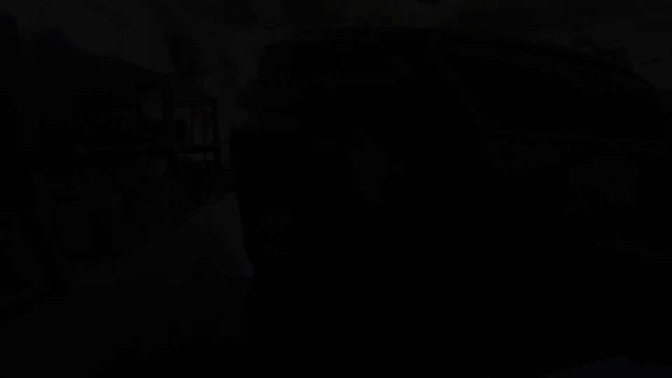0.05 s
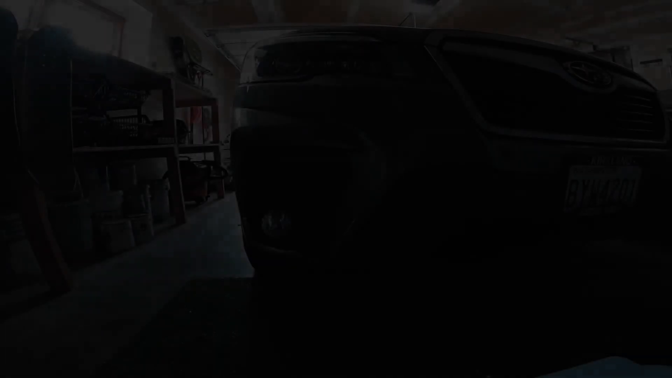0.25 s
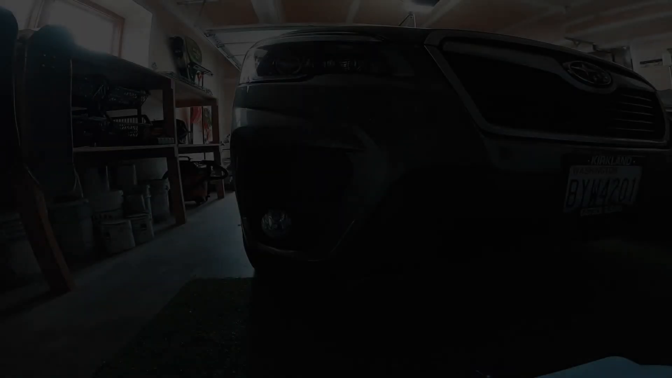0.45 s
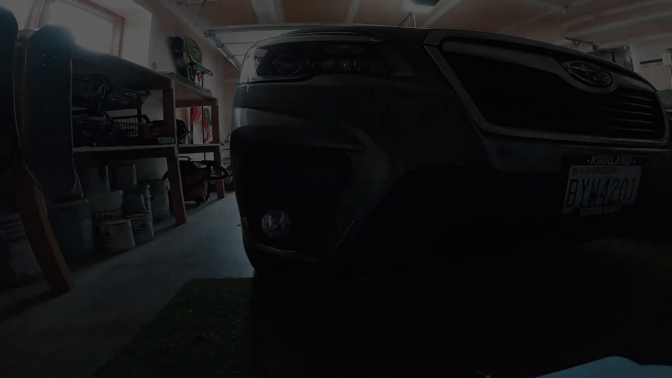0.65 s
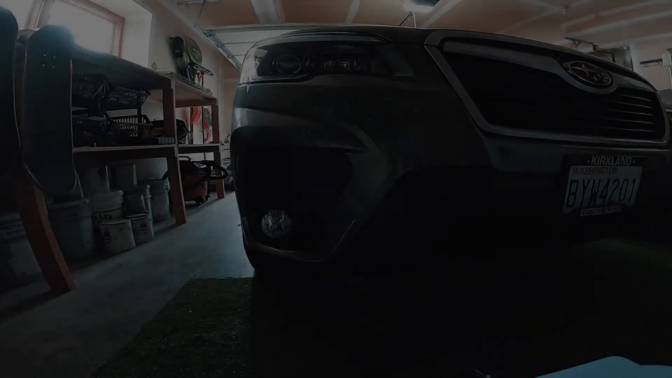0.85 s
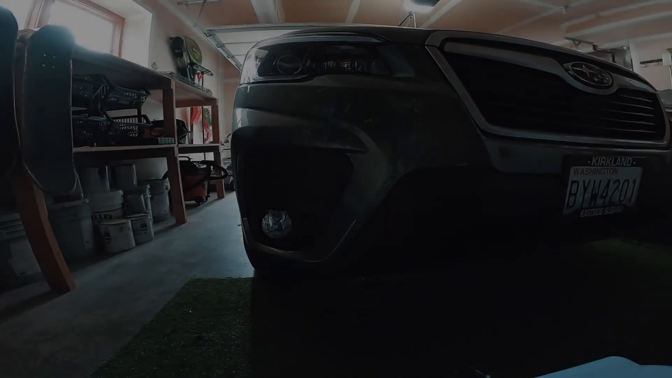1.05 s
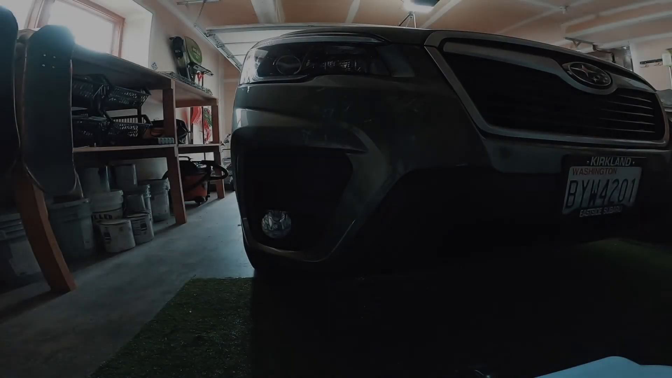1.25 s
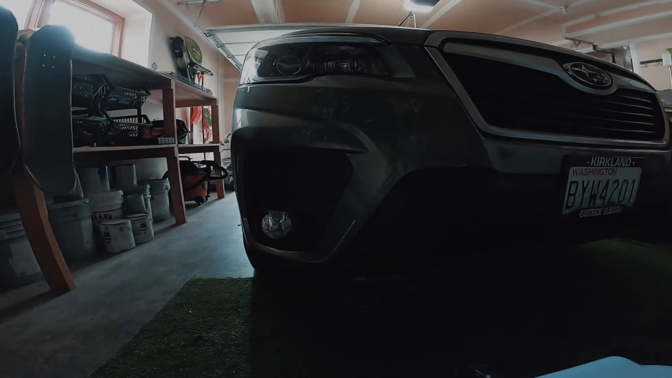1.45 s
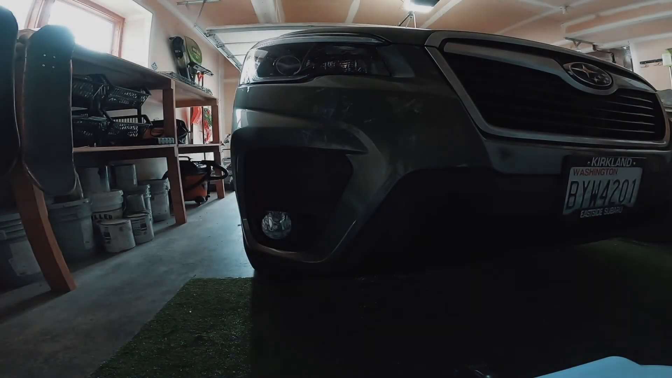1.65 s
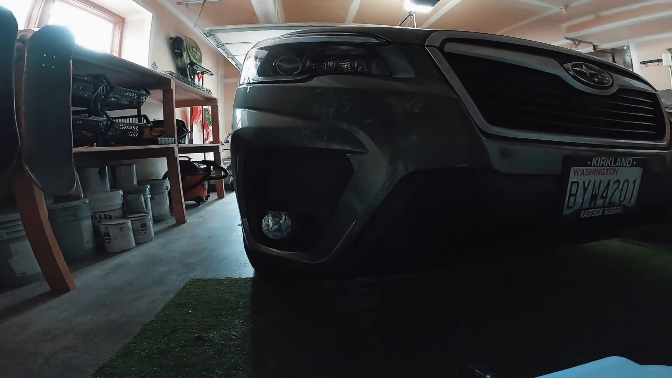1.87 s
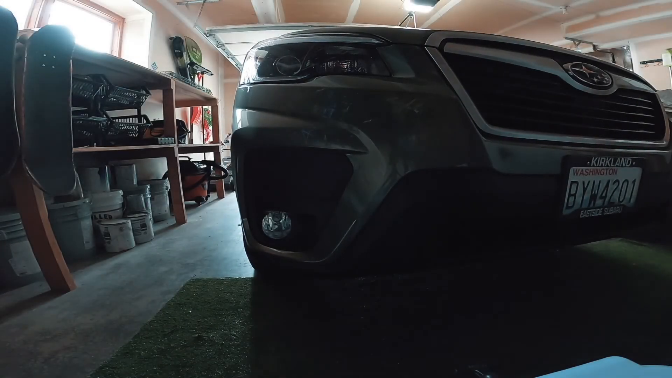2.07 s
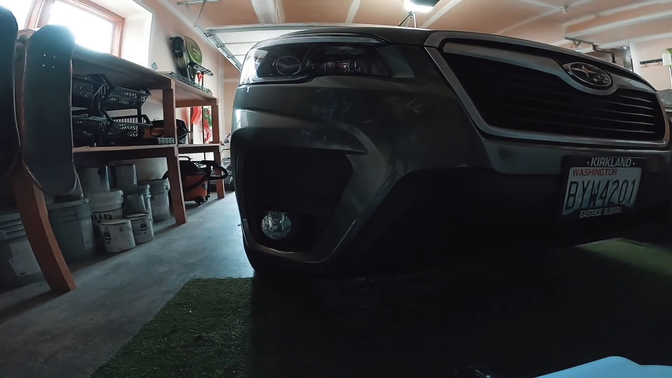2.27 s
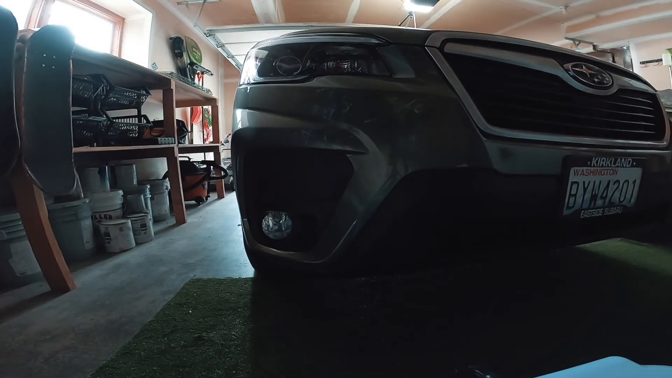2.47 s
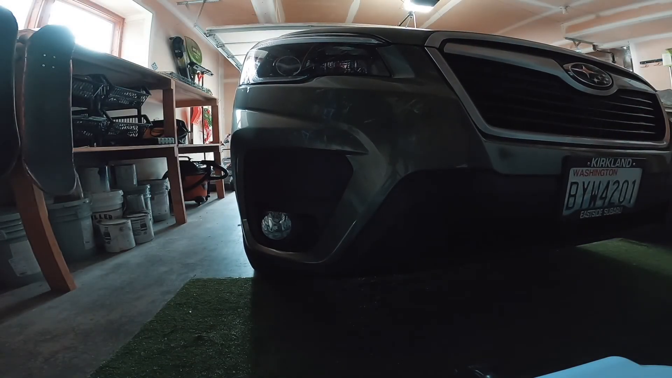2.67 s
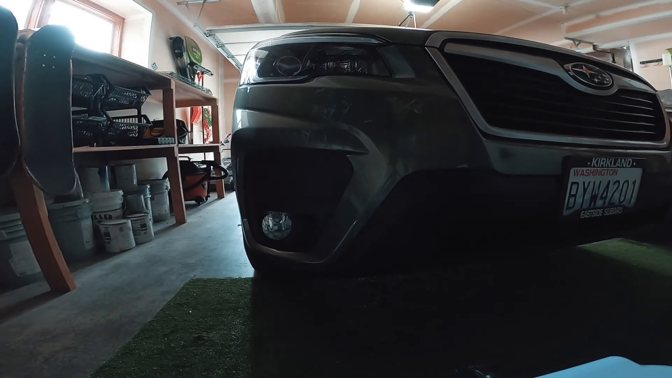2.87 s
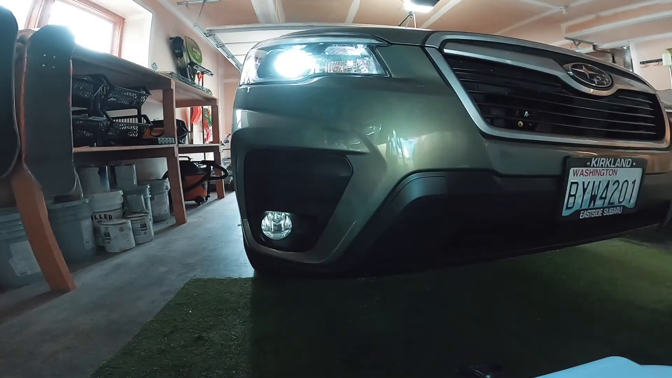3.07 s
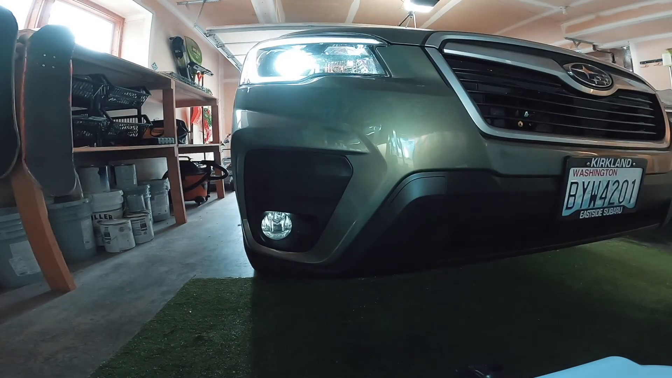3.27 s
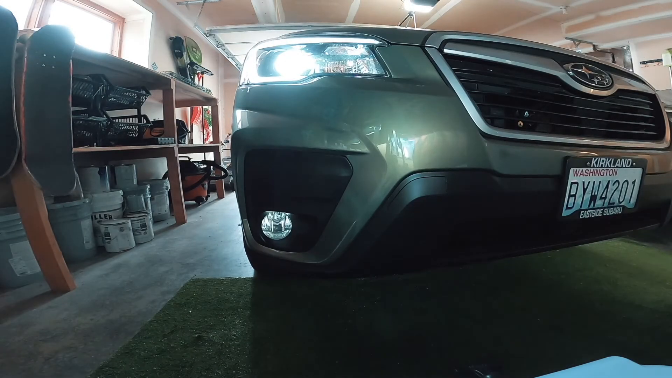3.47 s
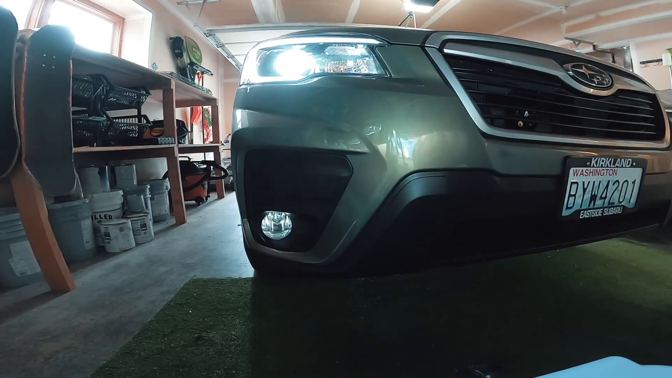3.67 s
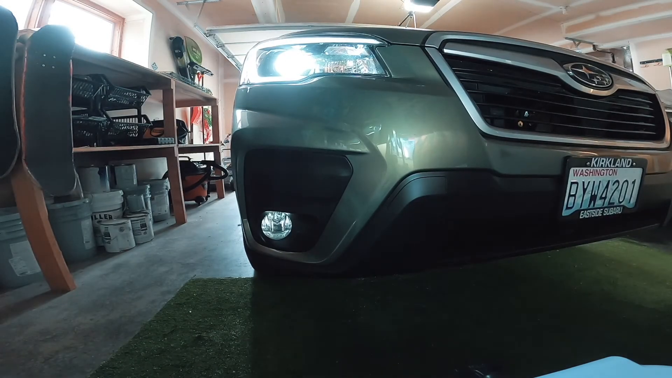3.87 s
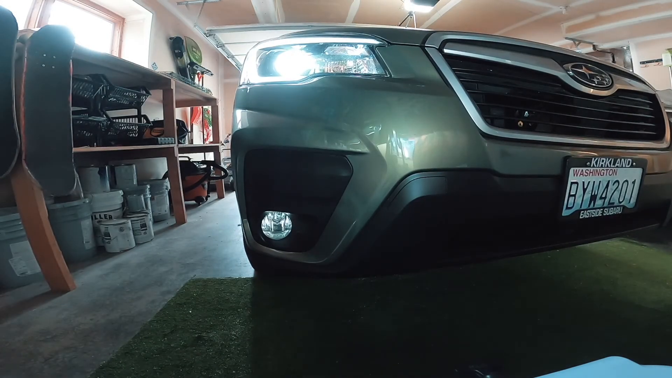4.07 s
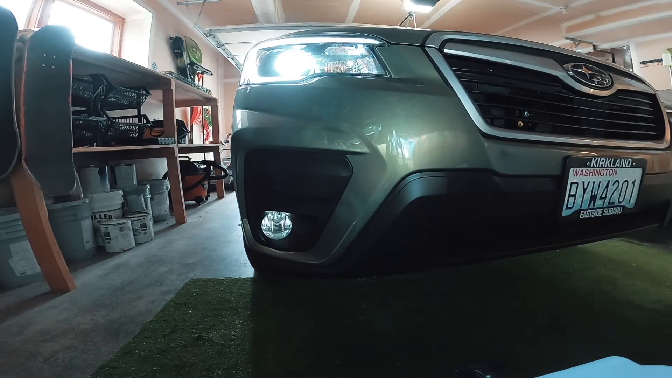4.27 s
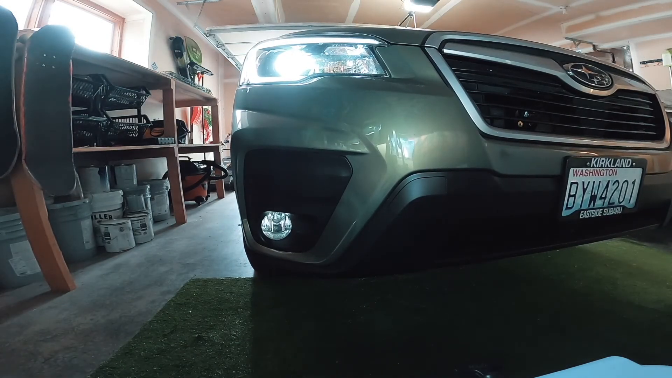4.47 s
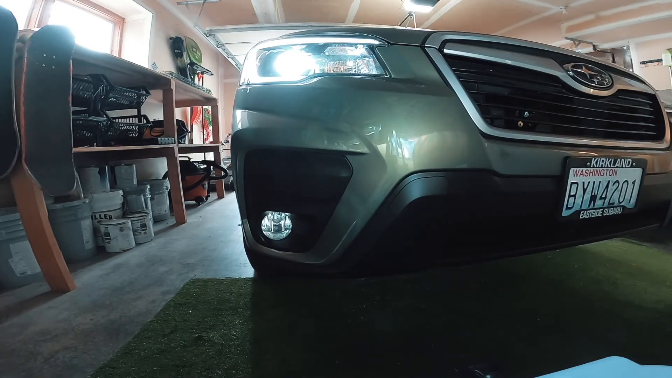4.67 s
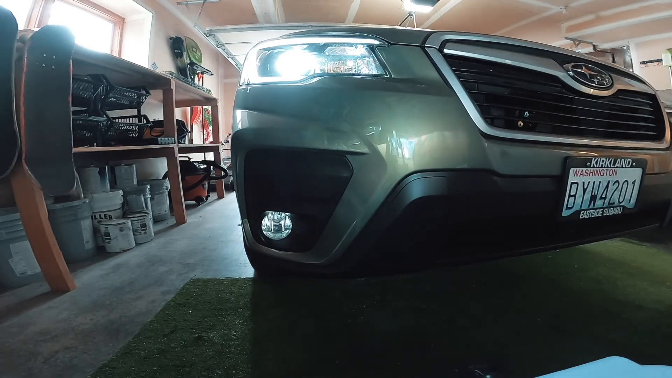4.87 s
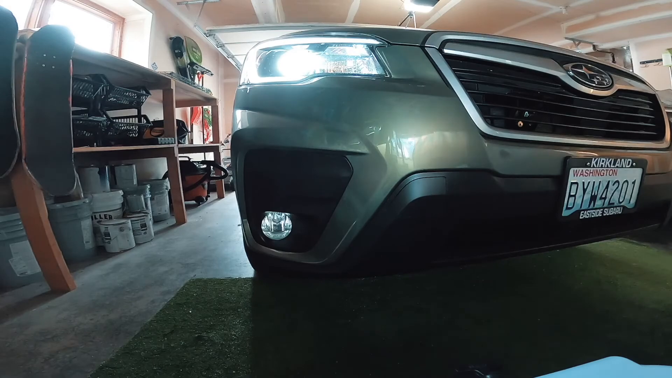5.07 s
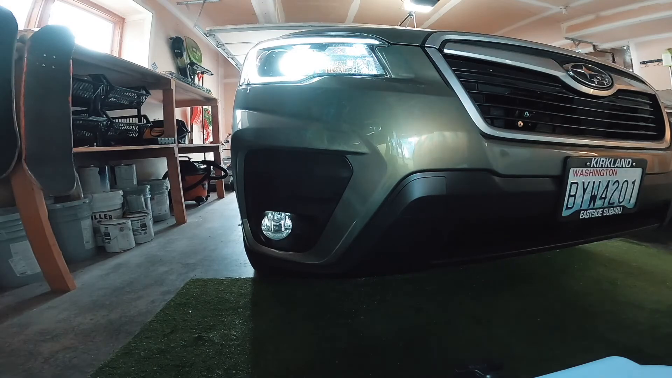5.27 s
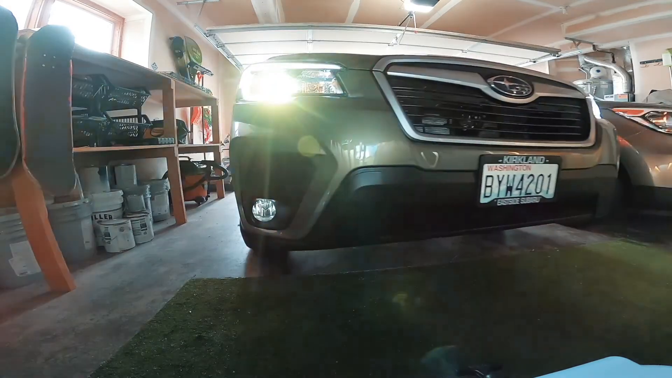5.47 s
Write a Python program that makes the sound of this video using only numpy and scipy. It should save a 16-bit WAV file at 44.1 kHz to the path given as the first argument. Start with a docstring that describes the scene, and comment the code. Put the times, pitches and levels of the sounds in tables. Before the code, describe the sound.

Car bumps and a heavy door slam, faint electric clicks and whine, then a grinding starter and an engine catching, flaring and dropping abruptly.

```python
"""In a home garage, by the front bumper of a car: a low rumble and hum, then clothes rustling as the driver
climbs in. Door blows are filtered noise with decaying modes and a cabin boom. Relays click and a fuel pump
whines as wavering tones. The starter's gear noise and whine sag with each compression while its pinion scrapes
and clanks. The four-cylinder engine catches and flares to a fast idle, then the sound jumps abruptly to a slow
idle: filtered firing pulses, exhaust and intake harmonics locked to the crankshaft, and hiss. Knocks, gear
teeth and firings echo in the garage."""
import sys
import numpy as np
from scipy import signal
from scipy.fft import rfft, irfft, next_fast_len
from scipy.io import wavfile
from scipy.ndimage import uniform_filter1d

SR = 44100
rng = np.random.default_rng(int(sys.argv[2]) if len(sys.argv) > 2 else 0)


def output_pcm(signal):
    """Save a mono or channel-first signal as 16-bit PCM at the path in sys.argv[1].

    Samples are clipped to [-1, 1] before scaling.
    """
    pcm = np.clip(np.atleast_2d(signal).T, -1, 1) * 32767
    wavfile.write(sys.argv[1], SR, np.round(pcm).astype(np.int16))


N = 243873
T = np.arange(N) / SR  # time [s]

# the electrics come on; the starter engages and lets go; the engine first fires [s]
POWER_S, STARTER_S, RELEASE_S, CATCH_S = 3.13, 3.902, 4.5, 4.555
GARAGE_T60_S = .38


def amp(db):
    """Level to gain: 20 dB is a factor of ten in amplitude."""
    return 10 ** (np.asarray(db) / 20)


def curves(table):
    """Linear interpolation in time, one line per column after the first."""
    times, *columns = np.transpose(table)
    return [np.interp(T, times, column) for column in columns]


def unit(x):
    """Normalisation to an rms of 1."""
    return x / np.sqrt(np.mean(x ** 2))


def noise(size=N):
    """White noise, uncorrelated between mid and side."""
    return rng.standard_normal((2, size))


def colour(x, points, tilt_db=0, peaks=()):
    """Linear filtering by an outline (Hz, dB), a tilt per octave and resonances (Hz, width Hz, dB)."""
    size = x.shape[-1]
    padded = next_fast_len(size + SR // 10)
    f = np.maximum(np.fft.rfftfreq(padded, 1 / SR), 1)
    hz, db = np.transpose(points)
    gain_db = np.interp(np.log(f), np.log(hz), db)
    gain_db = gain_db + tilt_db * np.log2(np.maximum(f, hz[0]) / hz[0])
    for centre, width, lift_db in peaks:
        gain_db = gain_db + lift_db / (1 + (2 * (f - centre) / width) ** 2)
    return irfft(rfft(x, padded) * amp(gain_db), padded)[..., :size]


def fade(t60_s):
    """Exponential decay by 60 dB in t60_s, cut off after one second."""
    return np.exp(-np.log(1000) * T[:SR] / t60_s)


def swell(on_s, off_s, rise_s, fall_s):
    """Exponential envelope: full from on to off, with 60 dB of rise before and 60 dB of fall after."""
    before = np.maximum(on_s - T, 0) / rise_s
    after = np.maximum(T - off_s, 0) / fall_s
    return np.exp(-np.log(1000) * (before + after))


def walk(rate_hz, size=N):
    """Random fluctuation: chance steps at the given rate, smoothed to an rms near 1."""
    step = max(int(SR / rate_hz), 1)
    steps = np.repeat(rng.standard_normal(size // step + 1), step)
    return unit(uniform_filter1d(steps, step)[:size])


def tone(hz, waver, rate_hz, depth=0.29):
    """Frequency and amplitude modulation: a whine of rms 1 whose pitch and strength waver at random."""
    channels = []
    for _ in range(2):  # mid and side
        strength = 1 + depth * walk(rate_hz)
        cycles = np.cumsum(hz * (1 + waver * walk(rate_hz))) / SR
        channels.append(unit(strength * np.sin(2 * np.pi * cycles)))
    return np.array(channels)


def pulses(turns, scatter_db):
    """Impulse train: one click of random size per whole turn."""
    clicks = np.diff(np.floor(turns), prepend=np.floor(turns[0]))
    return clicks * amp(scatter_db * rng.standard_normal(N))


def ring(modes):
    """Modal superposition: decaying sines, each slightly detuned from blow to blow."""
    total = 0
    for hz, db, t60_s in modes:
        detuned_hz = hz * (1 + 0.0029 * noise(1))
        total = total + amp(db) * fade(t60_s) * np.sin(2 * np.pi * detuned_hz * T[:SR])
    return total


def knock(points, tilt_db, hold_s, t60_s, attack_s=0.0024, rattle_db=2):
    """Impact noise: early reflections hold the rattle up for a moment, then it decays exponentially."""
    envelope = np.minimum(fade(t60_s) * amp(60 * hold_s / t60_s), 1)
    attack = 1 - np.exp(-T[:SR] / attack_s)
    rattle = amp(rattle_db * np.tanh(walk(300, size=SR)))
    return unit(colour(noise(SR) * rattle, points, tilt_db)) * envelope * attack


def garage(x, direct_db):
    """Convolution with a room response: a short burst from the source, then the dense echo of the walls."""
    path = noise(SR) * (fade(GARAGE_T60_S) + amp(direct_db) * fade(0.0059))
    return signal.fftconvolve(np.atleast_2d(x), path, axes=1)[:, :N]


def resonance(hz, peaks):
    """Resonant response: gain of a moving spectral line that passes through fixed resonances."""
    power = sum(amp(db) ** 2 / (1 + (2 * (hz - centre) / width) ** 2) ** 2 for centre, width, db in peaks)
    return np.sqrt(power)


def add(out, s, sound):
    """Superposition: mix a sound in at a time."""
    start = int(s * SR)
    out[:, start:start + sound.shape[1]] += sound[:, :N - start]


# spectrum of the low rumble: (frequency [Hz], level [dB])
RUMBLE_COLOUR = [(15, -17.5), (25, -8.5), (59, -9), (77, -5), (115, -8), (145, -11.5), (196, -21.5),
                 (250, -16), (295, -24), (344, -35), (373, -34), (427, -36.5), (637, -54.5), (1150, -45),
                 (1580, -54.5), (6720, -62), (15000, -93)]


def background(hum_hz=51.7, hum_db=-6, rumble_db=-2, level_db=-44, powered_db=5.5):
    """Stationary noise plus a hum: it fades in and grows a little stronger once the power is on."""
    powered = swell(POWER_S, T[-1], rise_s=0.31, fall_s=1)
    fade_in = np.clip(T - 0.059, 0, 1) ** 1.58  # one second long
    level = amp(level_db + powered_db * powered + walk(4.63)) * fade_in
    rumble = amp(rumble_db) * unit(colour(noise(), RUMBLE_COLOUR))
    return level * (rumble + amp(hum_db) * tone(hum_hz, waver=0.0083, rate_hz=5.5))


# clothes and seat, one row per movement: (time at its height [s], level [dB], rise [s], fall [s])
RUSTLE = [(.9, -62, 1.1, 0.82), (1.4, -70.5, 0.78, .7), (1.74, -58.5, 0.98, 0.67),
          (2.251, -60.5, 0.28, 1.43)]
# spectrum of the rustle: (frequency [Hz], level [dB])
RUSTLE_COLOUR = [(260, -28.5), (450, 0.5), (497, -4.5), (631, -17), (1020, -5.5), (1370, -6.5), (2100, -16),
                 (3790, -31), (5450, -33.5), (9000, -52), (11700, -79), (19800, -120)]


def driver(hold_s=0.044, uneven_db=1, sway_db=-40.5):
    """Friction noise of clothes at each movement; the car rumbles, swaying on its springs under the weight."""
    moves = sum(amp(db) * swell(s - hold_s, s + hold_s, rise_s, fall_s) for s, db, rise_s, fall_s in RUSTLE)
    rustle = unit(colour(noise(), RUSTLE_COLOUR)) * moves * amp(uneven_db * walk(27))
    sway = swell(1.94, 2.2, rise_s=1.7, fall_s=1.2) * unit(colour(noise(), RUMBLE_COLOUR))
    return rustle + amp(sway_db) * sway


# blows on door and body:
# (time [s], knock level [dB], tilt [dB/octave], boom level [dB], cabin boom frequency [Hz], boom t60 [s])
BLOWS = [(1.032, -27, 1.5, -13, 37, 0.76), (1.563, -34, 2.5, -17.5, 40.7, 0.42),
         (1.639, -40, 0, -13, 38, 0.17), (1.742, -32, -2, -21.5, 39, 1),
         (1.998, -35.5, -2, -30, 41.6, 0.86), (2.204, -38.5, -0.5, -49, 42, 0.44),
         (2.325, -18, -.5, -6.5, 28.2, 0.56), (2.356, -21.5, 0, -28, 53.9, 0.42),
         (2.409, -25, -2, -11, 56.4, 0.52)]
# spectrum of a blow: (frequency [Hz], level [dB])
DOOR_COLOUR = [(35, -40), (60, -1.5), (106, -7), (140, -4.5), (183, -18), (258, -14.5), (303, -27),
               (427, -22), (755, -37.5), (1090, -30.5), (3250, -45), (8280, -62), (14000, -92.5)]
# modes of door skin and cabin: (frequency [Hz], level [dB], t60 [s])
DOOR_MODES = [(108.4, -4, 0.32), (106.8, -7, 0.22), (126.4, -7, 0.62), (181, -18.5, 0.27),
              (226.3, -10.5, 0.21), (349.2, -14.5, 0.44), (416, -12.5, 0.19), (458, -9.5, 0.26),
              (934, -17.5, 0.15)]
# door latch snapping and catching: (time [s], level [dB])
LATCH = [(1.034, -62), (1.563, -65), (2.303, -33), (2.311, -38.5), (2.327, -23)]
# spectrum of the latch: (frequency [Hz], level [dB])
LATCH_COLOUR = [(150, -24.5), (450, 2.5), (800, -1.5), (1000, 1), (1600, -3), (2600, -11.5), (4000, -17.5),
                (7000, -38), (13000, -58)]


def door(hold_s=0.026, t60_s=.37, contact_s=0.00035, flutter_db=2):
    """Impact excitation: each blow rattles the door, rings its skin and pumps the cabin air; the latch crunches."""
    out = np.zeros((2, N))
    hardest_db = max(row[1] for row in BLOWS)
    for s, db, tilt_db, boom_db, boom_hz, boom_t60_s in BLOWS:
        # gentle bumps are cushioned, so they rise more slowly
        attack_s = contact_s * amp((hardest_db - db) / 2)
        body = knock(DOOR_COLOUR, tilt_db, hold_s, t60_s, attack_s)
        pressure = fade(boom_t60_s) * (1 - np.exp(-T[:SR] / 0.0086))
        flutter = amp(boom_db + flutter_db * walk(25.1, size=SR))
        boom = flutter * pressure * np.sin(2 * np.pi * boom_hz * T[:SR])
        add(out, s, amp(db) * (body + ring(DOOR_MODES)) + boom)
    for s, db in LATCH:
        add(out, s, amp(db) * knock(LATCH_COLOUR, tilt_db=-2.0, hold_s=0.011, t60_s=0.32))
    return out


# clicks: the first, at 3.074 s, comes with the dry tick; the rest are relays and actuators: (time [s], level
# [dB], tilt [dB/octave])
RELAYS = [(3.074, -47, -8), (3.132, -54.5, 2), (3.179, -56.5, -2), (3.219, -53.5, 1.5), (3.247, -45.5, -13),
          (3.322, -46, -4), (3.367, -40, -4.5), (3.437, -52.5, 0.5), (3.48, -61, 0.5)]
# spectrum of a relay click: (frequency [Hz], level [dB])
RELAY_COLOUR = [(290, -11.5), (500, -19), (703, -12), (784, -10.5), (1410, -3.5), (1730, -10), (3420, -13),
                (4080, -23), (7850, -31), (13000, -61)]
# modes of relay housings and motor gears: (frequency [Hz], level [dB], t60 [s])
RELAY_MODES = [(1098, -6, 0.29), (1312, -5, 0.22), (1405, -3, 0.27), (2240, -26, .22), (3250, -16.5, 0.26),
               (4580, -16, 0.15), (7900, -25, .2), (9100, -30, 0.15)]
# spectrum of the electric whirr: (frequency [Hz], level [dB])
WHIRR_COLOUR = [(260, -30), (450, -5), (758, -23), (945, -19.5), (985, -8.5), (1180, -12), (2280, -21),
                (2720, -20.5), (3390, -19), (12000, -48), (15600, -86), (22000, -120)]


def relays(snap_db=-2, ring_db=-7):
    """Impact and modal decay: each click is a short snap, a longer knock and a ringing housing."""
    out = np.zeros((2, N))
    for s, db, tilt_db in RELAYS:
        snap = amp(snap_db) * knock(RELAY_COLOUR, tilt_db + 1.5, hold_s=0.004, t60_s=0.044)
        body = knock(RELAY_COLOUR, tilt_db, hold_s=0.0064, t60_s=.2)
        add(out, s, amp(db) * (snap + body + amp(ring_db) * ring(RELAY_MODES)))
    return out


def ignition(pump_hz=1001, throttle_hz=3305, gears_hz=2250, whirr_db=-64, pump_db=-63, throttle_db=-66,
             gears_db=-62, strain_db=7, tick_db=-30):
    """Rotating-machine tones over noise: a dry tick, relays, a brief throttle motor and the priming fuel pump."""
    throttle_s, throttle_end_s, pump_s = 3.355, 3.49, 3.44
    powered = swell(POWER_S, STARTER_S, rise_s=.07, fall_s=0.19)
    throttle = swell(throttle_s, throttle_end_s, rise_s=0.33, fall_s=0.56)
    whirr = unit(colour(noise(), WHIRR_COLOUR, peaks=[(2200, 140, 2.4), (5230, 1500, 3.2)]))
    out = powered * amp(whirr_db + strain_db * throttle) * whirr
    pumping = swell(pump_s, STARTER_S, rise_s=.5, fall_s=.15)
    out += amp(pump_db) * pumping * tone(pump_hz, waver=0.00207, rate_hz=29, depth=0.14)
    settling = swell(throttle_end_s, throttle_end_s + .03, rise_s=.6, fall_s=1.1)
    out += amp(throttle_db) * settling * tone(throttle_hz, waver=0.006, rate_hz=410, depth=0.17)
    out += amp(gears_db) * throttle * tone(gears_hz, waver=.07, rate_hz=500)
    tick = colour(noise(SR) * fade(.004), [(800, 0), (3000, -8), (15000, -20)])
    add(out, 3.074, amp(tick_db) * tick)
    return out + relays()


# compressions that brake the starter: (time [s], half length [s])
COMPRESSIONS = [(4.254, .06), (4.396, .035), (4.551, .035)]


def compression(t):
    """Gas compression as a load on the starter: a Gaussian hump for each piston that comes up."""
    return sum(np.exp(-((t - s) / half_s) ** 2) for s, half_s in COMPRESSIONS)


# spectrum of the grinding gears: (frequency [Hz], level [dB])
STARTER_COLOUR = [(59, -54), (100, -20), (156, -16.5), (248, 4), (340, -0.5), (477, -15.5), (614, -9.5),
                  (977, -4.5), (1620, -13), (3050, -10.5), (5510, -19), (7410, -27.5), (8410, -24),
                  (8950, -29), (15500, -60.5)]
# gear case resonances that the whine sweeps through: (frequency [Hz], width [Hz], level [dB])
GEAR_CASE = [(2510, 150, -1.5), (2778, 45, 0)]
FREE_WHINE_HZ, SPIN_UP_S = 2797, .041  # the whine climbs to its free speed with this time constant
# share of speed lost in a compression; the gears grind harder just ahead of it and ease as they slow
SAG, STRAIN_LEAD_S, STRAIN_DB, SLOWED_DB = .17, 0.062, 3, -5.5


def starter(teeth_share=.18, grind_db=-31.5, grit_db=2, whine_db=-38.5, tooth_db=-44, octave_db=-7,
            rock_hz=26, rock_db=-37):
    """Gear meshing under varying load: teeth grind and sing, slowed by compressions; the engine rocks on its mounts."""
    load = compression(T)
    spin_up = 1 - np.exp(-np.maximum(T - STARTER_S, 0) / SPIN_UP_S)
    whine_hz = FREE_WHINE_HZ * spin_up * (1 - SAG * load)
    meshing = np.clip((T - STARTER_S) / .015, 0, 1)
    cranking = meshing * swell(STARTER_S, RELEASE_S, rise_s=.02, fall_s=1.0)

    chatter = 1 + .07 * walk(150)  # backlash makes the teeth meet unevenly
    tooth_turns = np.cumsum(whine_hz * teeth_share * chatter) / SR
    teeth = unit(garage(pulses(tooth_turns, scatter_db=4), direct_db=5))
    case_peaks = [(259, 51, 1.2), (484, 36, 5.2), (1104, 63, 4.2), (3130, 270, 1.1)]
    grind = unit(colour(teeth + noise(), STARTER_COLOUR, peaks=case_peaks))
    effort_db = STRAIN_DB * compression(T + STRAIN_LEAD_S) + SLOWED_DB * load
    out = amp(grind_db + effort_db + grit_db * np.tanh(walk(260))) * grind

    # the gears sing on the first free run, loudest on the resonances of their case, where the octave comes out too
    whine, octave, tooth = (tone(k * whine_hz, waver=.014 / np.sqrt(k), rate_hz=300) for k in (1, 2, teeth_share))
    sing = resonance(whine_hz, GEAR_CASE)
    first_s, first_half_s = COMPRESSIONS[0]
    free_run = swell(STARTER_S, first_s - first_half_s, rise_s=.02, fall_s=.4)
    singing = amp(whine_db) * sing * (whine + amp(octave_db) * sing ** 2 * octave)
    out += free_run * (singing + amp(tooth_db) * tooth)

    rocking = swell(first_s - STRAIN_LEAD_S, RELEASE_S, rise_s=0.19, fall_s=.3)
    return cranking * out + amp(rock_db) * rocking * tone(rock_hz, waver=0.086, rate_hz=20)


# starter pinion striking the ring gear: (time [s], level [dB], tilt [dB/octave], housing ring level [dB])
CLANKS = [(3.904, -32, 4, -41), (3.914, -20, 1.15, -50), (3.985, -36, -3, -34), (4.287, -22.5, -0.7, -31.5),
          (4.314, -30.5, -7, -38), (4.424, -23, -0.5, -29.5)]
# spectrum of a clank: (frequency [Hz], level [dB])
CLANK_COLOUR = [(59, -38), (100, -11.5), (452, -4), (646, -7), (942, -1), (1320, -3.5), (1530, -5.5),
                (2270, -11), (3180, -8.5), (3920, -18), (5480, -18), (7200, -24), (8340, -24), (8880, -31),
                (15000, -54)]
# modes of the starter housing: (frequency [Hz], level [dB], t60 [s])
HOUSING = [(245, -4, .5), (461.6, 6.5, 0.22), (900, -19, 0.17), (955, 6, 0.18), (1310, -7, 0.16),
           (1550, -20, 0.11), (2030, 5, 0.062), (2450, -7, 0.51), (2900, -2, 0.12)]
# thin rings of the freewheeling pinion: (time [s], length [s], level [dB])
PINION = [(3.974, .22, -51), (4.09, .02, -50), (4.303, 0.031, -39.5), (4.44, 0.044, -42.5),
          (4.595, 0.011, -41)]


def pinion(ring_hz=8215, overtone_hz=13290, overtone_db=-34, scrape_s=3.918, scrape_hz=1450, scrape_db=-27,
           scrape_octaves_per_s=7):
    """Friction and impact: the pinion scrapes into mesh with a falling screech, clanks on the ring gear and rings."""
    ringing = sum(amp(db) * swell(s, s + length_s, rise_s=0.079, fall_s=0.15) for s, length_s, db in PINION)
    overtone = amp(overtone_db) * tone(overtone_hz, waver=.003, rate_hz=160)
    out = ringing * (tone(ring_hz, waver=0.00205, rate_hz=130, depth=0.49) + overtone)
    falling_hz = scrape_hz * 2 ** (-scrape_octaves_per_s * np.maximum(T - scrape_s, 0))
    scraping = swell(scrape_s, scrape_s + 0.035, rise_s=0.013, fall_s=.12)
    out += amp(scrape_db) * scraping * tone(falling_hz, waver=0.067, rate_hz=430)
    for s, db, tilt_db, ring_db in CLANKS:
        strike = amp(db) * knock(CLANK_COLOUR, tilt_db, hold_s=0.0062, t60_s=0.31)
        add(out, s, strike + amp(ring_db) * ring(HOUSING))
    return out


# exhaust lines: (multiple of the firing rate, level [dB])
EXHAUST_ORDERS = [(.5, 3.5), (1, -0.5), (1.5, -13), (2, -49), (3, -12), (4, -12.5), (5, -26)]


def exhaust(turns, firing_hz, uneven_db, muffler_hz=118):
    """Harmonic synthesis behind a low-pass muffler; unequal cylinders add lines between the firing harmonics."""
    out = np.zeros(N)
    for k, db in EXHAUST_ORDERS:
        muffled = 1 / np.hypot(1, (k * firing_hz / muffler_hz) ** 3)
        level = np.sqrt(2) * amp(db + uneven_db * (k % 1 > 0))
        out += level * muffled * np.sin(2 * np.pi * (k * turns + rng.random()))
    return out


# intake and body resonances: (frequency [Hz], width [Hz], level [dB])
INTAKE = [(145, 19, -28), (226.7, 25, -9), (267.3, 12, 1), (303, 14.7, 0.5), (365, 19, -13),
          (393, 29, -18.5), (502, 41, -21), (510, 16, -22)]


def intake(turns, firing_hz, uneven_db=-3, count=40):
    """Forced resonance: harmonics of the four-stroke cycle swell as they sweep through fixed resonances."""
    out, running = np.zeros(N), turns > 0
    for k in np.arange(4, count) / 4:  # multiples of the firing rate
        # unequal cylinders fill in the lines between the firing harmonics
        strength = amp(uneven_db * (k % 1 > 0)) * resonance(k * firing_hz[running], INTAKE)
        out[running] += strength * np.sqrt(2) * np.sin(2 * np.pi * (k * turns[running] + rng.random()))
    return out


def voice(law, octaves, effort):
    """Power law of speed: gain of one engine voice at a speed in octaves from fast idle and an effort."""
    idle_db, speed_db, effort_db = law
    return amp(idle_db + speed_db * octaves + effort_db * effort)


# engine speed: (time [s], firing rate [1/s])
SPEED = [(4.5, 20.6), (4.648, 35.7), (4.692, 42), (4.754, 53), (4.85, 60.8), (4.948, 63.3), (5.03, 59.9),
         (5.31, 65), (5.34, 31)]
# spectrum of the engine block: (frequency [Hz], level [dB])
BLOCK_COLOUR = [(41, -25), (70, 0.5), (88, -1.5), (168, -12), (296, -1), (378, -15), (492, -11),
                (786, -18.5), (943, -18.5), (1110, -19), (1330, -15.5), (1700, -21.5), (1840, -17.5),
                (4420, -34), (9000, -43.5), (11700, -53), (19800, -120)]
# peaks and a dip in the sound of cover and manifold: (frequency [Hz], width [Hz], level [dB])
BLOCK_PEAKS = [(280, 45, -2), (486, 62, 4.5), (944, 94, 9.5), (1387, 12.5, 10.5), (1785, 27, 8.5),
               (3050, 130, 9.5), (4350, 63, 13), (5600, 63, 10)]
# how each voice follows speed and effort: (level at fast idle [dB], slope [dB/octave], rise at full effort [dB])
EXHAUST_LAW = (-27.5, -7.5, 5.8)
INTAKE_LAW = (-25, 18, 10.5)
CLATTER_LAW = (-24.5, 14.2, 13.6)
HISS_LAW = (-36, 2.84, 11.65)
FAST_IDLE_HZ = 60  # firing rate
FLARE_END_S, PULL_END_S = 4.62, 4.715  # end of the hard first strokes, end of the pull up to speed
DRONE_BUILD_DB, DRONE_BUILD_S = -14.5, 0.55  # the drone starts weaker and builds up as the throttle settles


def engine(rush_db=-5, uneven_db=-9, uneven_db_per_octave=8, throb=.13):
    """Periodic excitation: four cylinders knock by their own paths; exhaust booms, intake drones, air rushes."""
    firing_hz, = curves(SPEED)
    octaves = np.log2(firing_hz / FAST_IDLE_HZ)
    running = T > SPEED[0][0]
    flare = swell(CATCH_S, FLARE_END_S, rise_s=1.0, fall_s=0.47)
    pull = swell(FLARE_END_S, PULL_END_S, rise_s=0.051, fall_s=0.39)
    turns = np.cumsum(firing_hz * running) / SR  # counted in firings, two per crankshaft turn

    cylinders = (garage(pulses((turns + k) / 4, scatter_db=1.5), direct_db=2) for k in range(4))
    knocks = sum(cylinders) / np.sqrt(firing_hz)
    gate = 1 + throb * np.cos(np.pi * turns)  # the clatter swells once per crankshaft turn
    clatter = gate * (knocks / np.std(knocks[:, running]) + amp(rush_db) * noise())
    block = colour(clatter, BLOCK_COLOUR, peaks=BLOCK_PEAKS)
    out = voice(CLATTER_LAW, octaves, flare) * block / np.std(block[:, running])

    hiss_colour = [(1500, 4.0), (4000, 5), (5500, -3.5), (8000, -7.5), (10000, -13), (13000, -23), (15000, -38)]
    out += voice(HISS_LAW, octaves, flare) * unit(colour(noise(), hiss_colour))

    fired = swell(CATCH_S, T[-1], rise_s=.04, fall_s=1)
    boom = exhaust(turns, firing_hz, uneven_db + uneven_db_per_octave * octaves)
    out += fired * voice(EXHAUST_LAW, octaves, pull) * boom
    build = amp(np.interp(T, [CATCH_S, CATCH_S + DRONE_BUILD_S], [DRONE_BUILD_DB, 0]))
    out += build * voice(INTAKE_LAW, octaves, pull) * intake(turns, firing_hz)
    return out * np.interp(T, [SPEED[0][0], CATCH_S], [0, 1])


# stereo width: (frequency [Hz], side minus mid [dB])
WIDTH = [(60, -18.5), (110, -36), (200, -16), (380, -18.5), (700, -11.5), (1290, -9.5), (2380, -6.5),
         (4400, -3), (8120, -0.5), (15000, 1.5)]
# stereo balance: (frequency [Hz], left minus right [dB])
LEAN = [(60, -0.5), (110, -1), (200, -1), (380, -2), (700, -1), (1290, -1), (2380, 0.5), (4400, -0.5),
        (8120, -4), (15000, 2)]
PORT_LAG_S = .00003
DIFFUSE_HZ = 4000  # above this the walls' echo hides the direction


def scene():
    """Interaural-style phase delay: two close ports hear the same bass, the left a little later, and a diffuse treble."""
    mid, side = background() + driver() + door() + ignition() + starter() + pinion() + engine()
    side = colour(side, WIDTH)
    f = np.fft.rfftfreq(N, 1 / SR)
    lag_s = PORT_LAG_S / (1 + (f / DIFFUSE_HZ) ** 2)
    late = irfft(rfft(mid) * np.exp(-2j * np.pi * f * lag_s), N)
    left = colour(late + side, [(hz, db / 2) for hz, db in LEAN])
    right = colour(mid - side, [(hz, -db / 2) for hz, db in LEAN])
    return np.array([left, right])


def record(dry):
    """Band limiting: a steep elliptic low-pass removes everything above 15.2 kHz."""
    return signal.sosfilt(signal.ellip(8, .2, 70, 15200, fs=SR, output="sos"), dry)


dry = scene()
out = record(dry)
output_pcm(out)
```